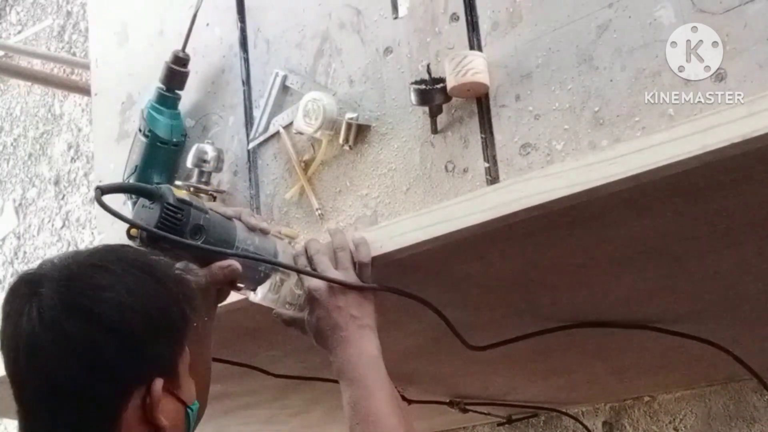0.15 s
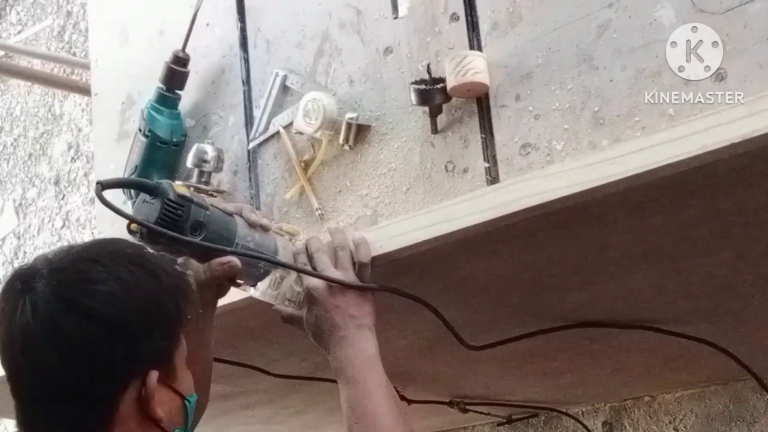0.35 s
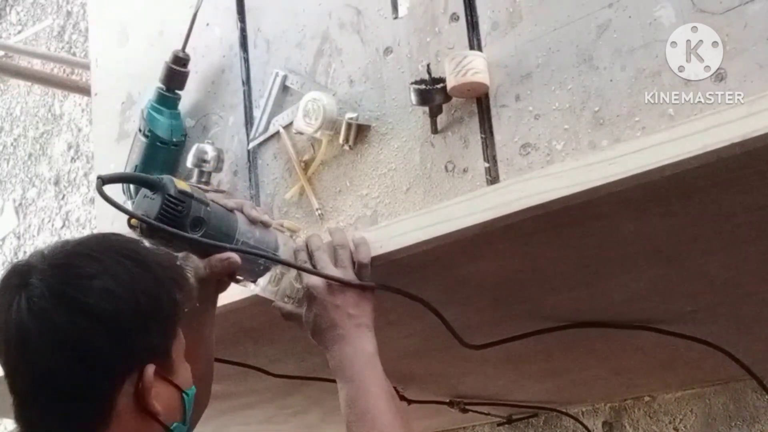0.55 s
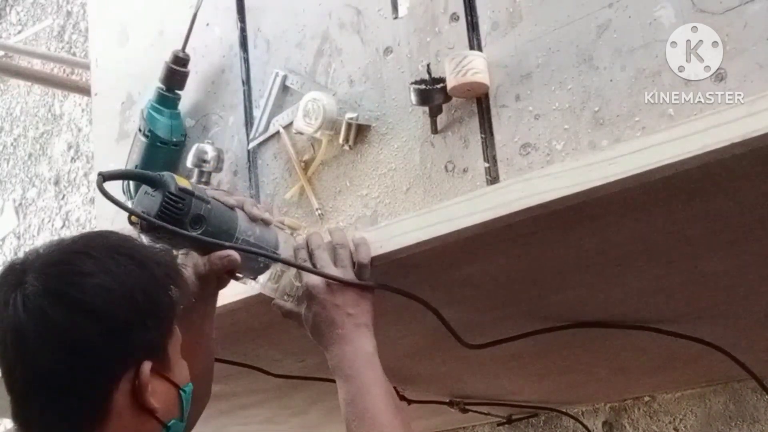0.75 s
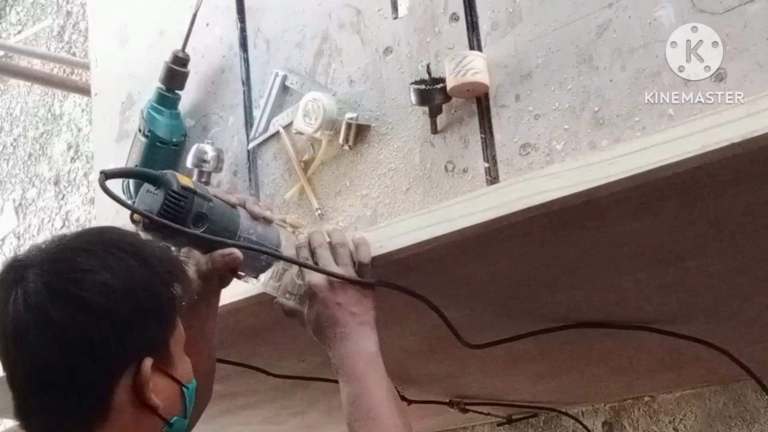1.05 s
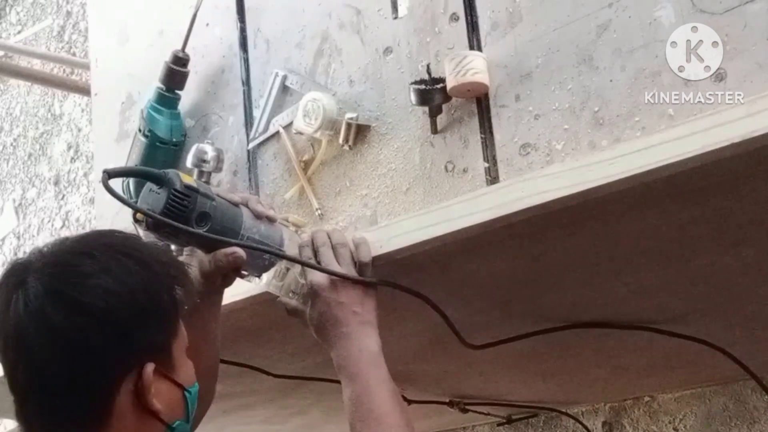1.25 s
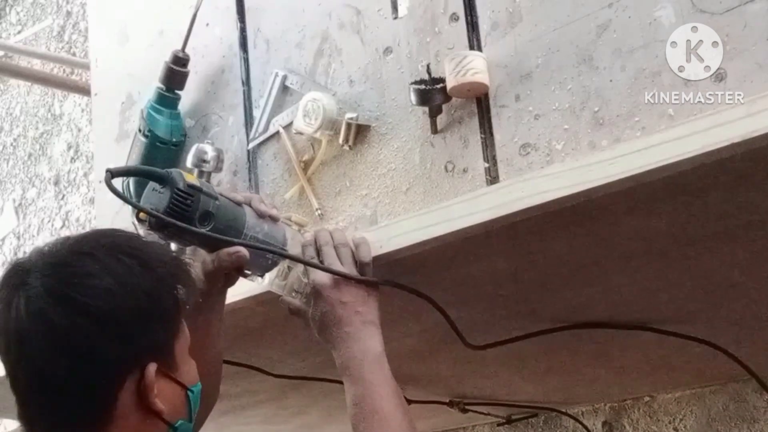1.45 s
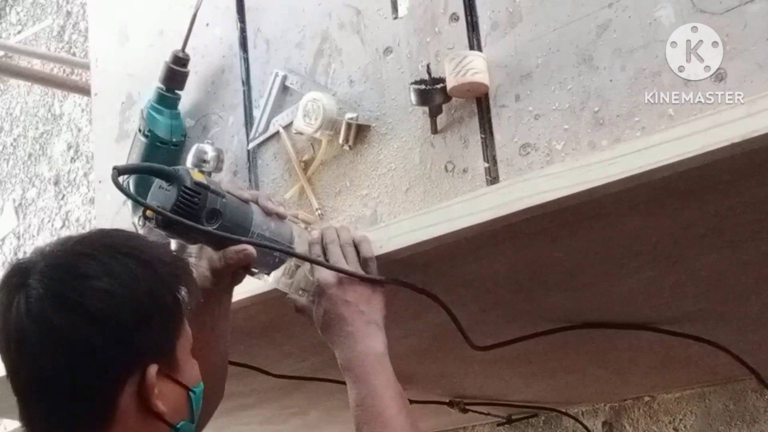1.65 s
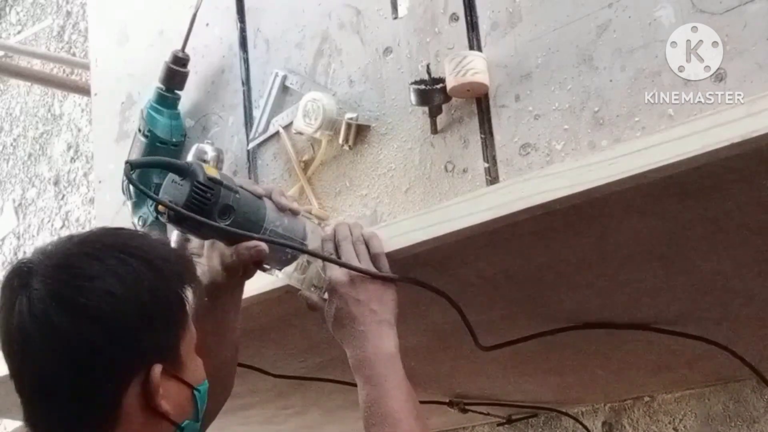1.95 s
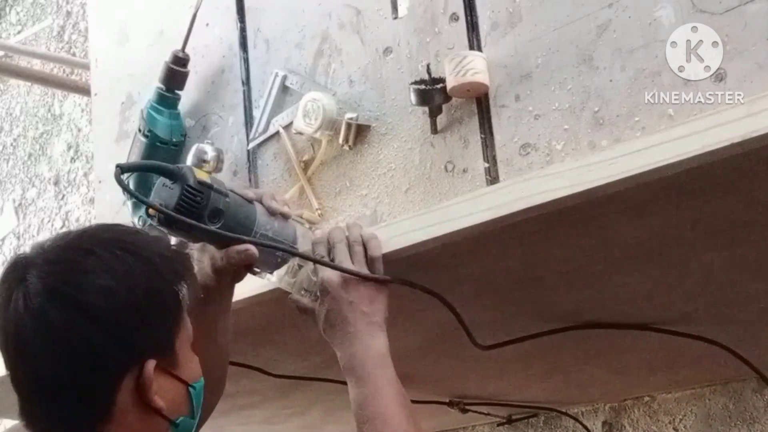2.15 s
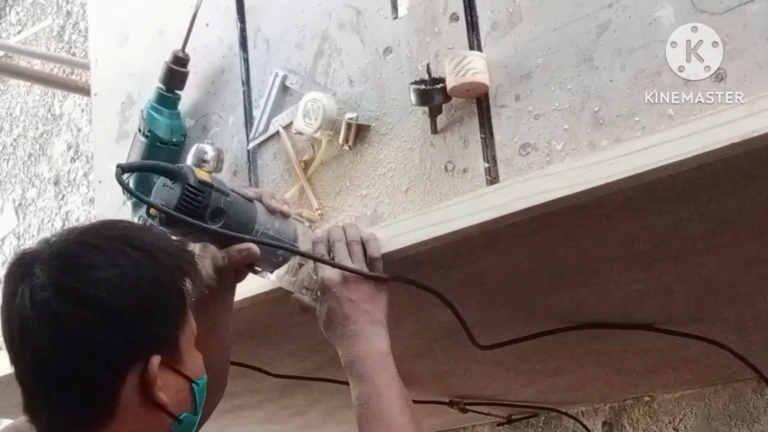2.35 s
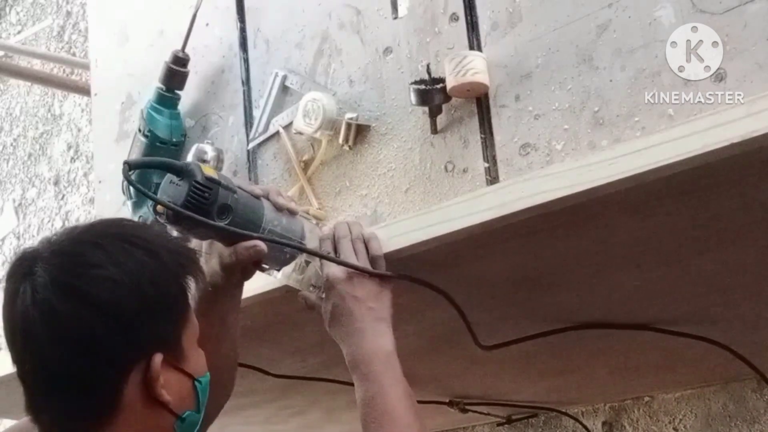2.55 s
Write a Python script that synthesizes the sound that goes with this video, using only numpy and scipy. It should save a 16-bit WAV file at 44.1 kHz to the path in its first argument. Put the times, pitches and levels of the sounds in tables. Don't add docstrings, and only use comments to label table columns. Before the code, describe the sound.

Handheld electric router running continuously, thin high whine and airy roar, cutting wood with faint knocks

```python
import sys
import numpy as np
from scipy import signal
from scipy.io import wavfile
from scipy.ndimage import uniform_filter1d

SR = 44100
rng = np.random.default_rng(int(sys.argv[2]) if len(sys.argv) > 2 else 0)


def amplitude_ratio(level_db):
    exponent = np.asarray(level_db, float) / 20
    return 10 ** exponent


def log_audio(samples):
    frames = np.atleast_2d(samples).T
    limited = np.clip(frames, -1, 1)
    pcm = np.round(limited * 32767).astype(np.int16)
    wavfile.write(sys.argv[1], SR, pcm)


N = 119070
TIME = np.arange(N) / SR

# (frequency [Hz], density [dB per Hz])
AIR_COLOUR = [(15, -53), (25, -42), (331, -20.5), (742, -20.5), (1240, -12.5), (1620, -13.5), (6560, -16),
              (8140, -11), (15500, -28.5)]
AIR_DB = -55
# (time [s], level [dB])
AIR_FLOW = [(0.0, -61), (0.12, -57), (0.35, -53.5), (0.55, -56), (0.66, -50.5), (0.8, -53), (0.93, -55),
            (1.0, -52.5), (1.2, -53.5), (1.27, -61), (1.42, -51), (1.55, -59), (1.72, -48.5), (1.97, -59.5),
            (2.15, -52), (2.36, -55), (2.45, -50.5), (2.62, -64), (2.7, -48.5)]
GUST_DB, WANDER = 1.0, 0.012
# (frequency [Hz], width [Hz], level [dB])
HOUSING_HOLLOWS = [(1254, 76, 1), (1207, 40, -9.5), (1336.3, 30, -5.5), (1151, 19, -10.5)]
# (frequency [Hz], width [Hz], level [dB])
STEADY_HOLLOWS = [(841.4, 78, -73), (336.6, 55, -74.5), (173.2, 28, -78), (252.6, 36, -82),
                  (461.6, 13, -83), (1444, 390, -62.5), (2067, 180, -68.5), (924.5, 27, -75),
                  (2203, 680, -65), (5315, 820, -61.5), (8230, 1040, -61), (4280, 400, -68),
                  (10730, 1900, -66.5), (110, 160, -81)]
# (time [s], peak level [dB], frequency [Hz], width [s])
AIR_SURGES = [(0.151, -43.5, 1239, 0.01), (0.18, -43.5, 1262, 0.015), (0.385, -44, 1268, 0.006),
              (0.469, -42, 1288, 0.0087), (0.495, -43, 1236, 0.018), (0.578, -44.5, 1277, 0.0069),
              (0.649, -41.5, 1247, 0.012), (0.698, -42.5, 1242, 0.0053), (0.705, -41, 1250, 0.006),
              (0.758, -42, 1262, 0.012), (0.777, -43, 1245, 0.0034), (0.791, -41.5, 1260, 0.0095),
              (0.854, -45.5, 1215, 0.0081), (0.89, -38.5, 1260, 0.0036), (1.01, -42.5, 1234, 0.029),
              (1.053, -42.5, 1240, 0.005), (1.174, -45.5, 1253, 0.028), (1.303, -39.5, 1247, 0.0073),
              (1.379, -44, 1280, 0.012), (1.447, -38.5, 1235, 0.016), (1.465, -37.5, 1268, 0.007),
              (1.476, -41.0, 1251, 0.007), (1.487, -44, 1275, 0.006), (1.585, -40.5, 1256, 0.018),
              (1.69, -37.5, 1261, 0.013), (1.706, -46, 1288, 0.0067), (1.738, -44, 1268, 0.0055),
              (1.765, -41.5, 1258, 0.014), (1.781, -39, 1236, 0.0086), (1.797, -42.0, 1268, 0.0067),
              (1.837, -38, 1238, 0.01), (1.849, -40, 1253, 0.0035), (1.875, -43.5, 1295, 0.0043),
              (1.887, -38.5, 1308, 0.005), (1.933, -40.5, 1254, 0.01), (1.944, -39.5, 1250, 0.013),
              (2.033, -42.5, 1291, 0.0057), (2.116, -44.5, 1272, 0.007), (2.165, -44.5, 1269, 0.0092),
              (2.223, -42, 1279, 0.007), (2.263, -38.5, 1226, 0.01), (2.294, -43.0, 1225, 0.007),
              (2.324, -45, 1253, 0.017), (2.423, -43, 1295, 0.012), (2.437, -42, 1320, 0.0068),
              (2.557, -45, 1244, 0.0064), (2.567, -41, 1255, 0.005), (2.687, -43.5, 1254, 0.015)]
SURGE_STRETCH, SURGE_DUCK = 0.61, 0.98

# (time [s], peak level [dB], pitch [Hz], length [s])
DOOR_BUMPS = [
    (0.761, -39, 110, 0.032),
    (0.788, -54, 117, 0.0263),
    (.65, -68, 100, 0.049),
    (1.805, -65, 118, .07),
    (2.526, -64, 98, 0.057),
    (2.58, -66, 149, .05),
]
# (time [s], length [s], level [dB])
HAND_SHUFFLES = [
    (.33, .09, -71),
    (.79, .09, -68),
    (.885, .14, -68),
    (.56, .04, -73),
    (2.42, .06, -73),
]
# (time [s], length [s], frequency [Hz], level [dB])
WOOD_RINGS = [(.57, .08, 2640, -59), (1.11, .05, 1550, -60), (1.3, .1, 8810, -57), (2.24, .07, 825, -60),
              (.53, .06, 830, -63), (1.33, .06, 825, -65), (1.52, .08, 3510, -63), (1.9, .07, 3590, -57),
              (1.61, .07, 835, -66), (.39, .05, 335, -65), (.78, .04, 325, -66), (1.73, .07, 325, -65),
              (1.54, .07, 325, -67), (2.26, .04, 330, -66)]

# (time [s], flute passes [Hz])
SPINDLE_SPEED = [(0.0, 897.7), (0.16, 899.2), (0.51, 894.2), (0.6, 886.8), (0.63, 881.2), (0.75, 878.9),
                 (0.95, 896.9), (1.07, 898.5), (1.22, 887.5), (1.46, 876.2), (1.54, 877.3), (1.76, 905.7),
                 (1.97, 894.3), (2.1, 905.1), (2.4, 906.4), (2.42, 905.8), (2.53, 897.0), (2.7, 897.0)]
WOBBLE = 0.0009
# (time [s], whine level [dB], overtone level [dB])
FAN_WHINE = [(0.0, -45, -78), (0.09, -52, -62), (0.24, -51, -65.0), (0.43, -45.5, -72),
             (0.73, -50.5, -71.0), (0.89, -44, -74), (0.96, -51.5, -88), (1.23, -45, -66.0),
             (1.24, -48, -72), (1.53, -49, -69), (1.59, -50, -72.0), (1.88, -49, -70.0), (1.94, -53, -76),
             (2.09, -43.5, -70), (2.36, -42, -76), (2.49, -50, -61), (2.63, -53.5, -96), (2.7, -48, -65.0)]
# (time [s], width [s], depth [dB])
WHINE_NULLS = [(.95, .012, -4), (1.37, .01, -5), (1.578, .009, -11), (1.68, .01, -16), (1.728, .008, -9),
               (1.77, .01, -5), (1.91, .01, -9), (1.962, .014, -18), (2.25, .015, -4), (2.31, .015, -4),
               (2.685, .012, -13)]
# (time [s], level [dB])
CUTTER_HUM = [(0, -58), (.26, -55), (.55, -56), (.62, -60), (.73, -57), (.78, -78), (.88, -72), (1.04, -61),
              (1.15, -56), (1.2, -72), (1.27, -60), (1.4, -65), (1.55, -60), (1.6, -78), (1.74, -74),
              (1.775, -54), (1.92, -45), (1.98, -55), (2.06, -68), (2.12, -78), (2.2, -65), (2.25, -74),
              (2.32, -63), (2.36, -78), (2.42, -60), (2.53, -47), (2.7, -53)]
# (time [s], flute tone [dB], 9th multiple [dB], collet ring [dB])
BASE_PLATE = [(0.0, -59, -59, -66), (0.17, -62.5, -53.5, -67), (0.49, -61.5, -66, -71),
              (0.53, -64.5, -57, -53), (0.59, -77, -70, -70), (0.82, -77, -65, -70), (0.88, -61, -59, -77),
              (1.04, -58, -60, -61), (1.4, -90, -62, -61), (1.55, -86, -69, -55), (1.63, -78, -58, -67),
              (1.73, -58.5, -60.5, -63), (1.92, -63, -51, -61.5), (2.0, -70, -72, -57),
              (2.07, -57, -58, -67), (2.21, -62, -60.0, -58), (2.28, -66, -59, -58.5),
              (2.34, -61, -66, -64), (2.43, -57.0, -54, -57.5), (2.63, -66, -62, -58), (2.7, -62, -61, -55)]
# (time [s], level [dB])
EDGE_CHATTER = [(0, -71), (.45, -69), (.6, -77), (.95, -77), (1.05, -68), (1.22, -65), (1.45, -72),
                (1.73, -72), (1.77, -60), (1.9, -56), (1.96, -60), (2.03, -68), (2.15, -71), (2.28, -63),
                (2.41, -70), (2.46, -57), (2.56, -54), (2.7, -61)]
# (multiple of the flute rate, level over the chatter [dB])
CHATTER_TONES = [(4, -15), (10, 0), (11, -9), (12, -5), (13, -13), (14, -15), (15, -19), (17, -18)]
SEVENTH_DB = -73
FADING, CHATTER_FADING, SKIRT = 0.13, 0.48, 0.1

# (time [s], length [s])
BIT_SQUEAL = (.553, .157)
SQUEAL_HZ, SQUEAL_DB, SQUEAL_WAVER_HZ = 7600, -48, 22
# (distance [flute rates], level [dB])
SQUEAL_SIDE_TONES = [(0, 4.5), (2, -3), (4, -27)]


def evened(x):
    return x / np.sqrt(np.mean(x ** 2) + 1e-20)


def curve(table, axis):
    rows = np.array(table)
    line = np.interp(TIME, rows[:, 0], rows[:, axis])
    return uniform_filter1d(line, size=800)


def drift(width):
    length = max(int(SR / 16 / width), 2)
    steps = N // 16 + 2
    slow = uniform_filter1d(rng.standard_normal(steps), length)
    slow = evened(uniform_filter1d(slow, length))
    return np.interp(np.arange(N) / 16, np.arange(steps), slow)


def resonate(x, hz, width):
    turn = np.exp(2j * np.pi * np.cumsum(hz * np.ones(N)) / SR)
    r = np.exp(-np.pi * width / SR)
    smooth = signal.lfilter([1], np.convolve([1, -r], [1, -r]), x / turn)
    return (turn * smooth).real


def ringing_noise(hz, width):
    return evened(resonate(rng.standard_normal(N), hz, width))


def add(mix, s, sound):
    part = mix[round(s * SR):][:len(sound)]
    part += sound[:len(part)]


def tone(phase, db, fading):
    slow = fading * (drift(37.5) + 1j * drift(53))
    fast = SKIRT * (drift(190) + 1j * drift(140))
    start = 2 * np.pi * rng.random()
    return (amplitude_ratio(db) * (1 + slow + fast) * np.exp(1j * (phase + start))).real


def air_noise():
    frames, hz = N // 256 + 5, np.fft.rfftfreq(1024, 1 / SR)
    real, imaginary, patches = rng.standard_normal((frames, 513, 3)).T
    patches = uniform_filter1d(patches, size=14, axis=0)
    patches = evened(uniform_filter1d(patches, size=12, axis=1))
    f, db = np.transpose(AIR_COLOUR)
    colour_db = np.interp(np.log(hz + 1), np.log(f), db)[:, None]
    spectrum = (real + 1j * imaginary) * amplitude_ratio(colour_db + 1.6 * patches)
    noise = signal.istft(spectrum, nperseg=1024, noverlap=768)[1][:N]
    return amplitude_ratio(AIR_DB) * evened(noise)


def surges():
    s, db, hz, width = np.transpose(AIR_SURGES)[:, :, None]
    swell = np.exp(-((TIME - s) / (SURGE_STRETCH * width)) ** 2)
    start = 2 * np.pi * rng.random((len(AIR_SURGES), 1))
    rings = (amplitude_ratio(db) * swell * np.sin(2 * np.pi * hz * TIME + start)).sum(0)
    return rings, 1 - SURGE_DUCK * swell.max(0)


def roar():
    rings, duck = surges()
    out = air_noise() + rings
    gust = duck * amplitude_ratio(curve(AIR_FLOW, axis=1) + GUST_DB * drift(27))
    wander = 1 + WANDER * drift(5.5)
    for hz, width, db in HOUSING_HOLLOWS:
        level = amplitude_ratio(db + 0.41 * drift(27))
        out += gust * level * ringing_noise(hz * wander, width)
    for hz, width, db in STEADY_HOLLOWS:
        level = amplitude_ratio(db + min(1.8, 900 / hz) * drift(11))
        out += level * ringing_noise(hz, width)
    return out


def knocks():
    out = np.zeros(N)
    for s, db, hz, length in DOOR_BUMPS:
        t = np.arange(0, length, 1 / SR)
        swell = np.sin(np.pi * (t / length) ** 0.64) ** 4.9
        add(out, s, -amplitude_ratio(db) * swell * np.cos(2 * np.pi * hz * (t - length / 2)))
    for s, length, db in HAND_SHUFFLES:
        rub = resonate(rng.standard_normal(N), 67, 81)[4000:]
        rub = evened(rub[:round(length * SR)])
        add(out, s, amplitude_ratio(db) * np.hanning(len(rub)) ** 0.5 * rub)
    for s, length, hz, db in WOOD_RINGS:
        t = np.arange(0, length, 1 / SR)
        add(out, s, amplitude_ratio(db) * np.sin(np.pi * t / length) * np.sin(2 * np.pi * hz * t))
    return out


def squeal(turns):
    start, length = BIT_SQUEAL
    u = np.clip((TIME - start) / length, 0, 1)
    hz = SQUEAL_HZ * (1 - 0.004 * (u - 0.5)) + SQUEAL_WAVER_HZ * drift(140)
    phase = 2 * np.pi * np.cumsum(hz) / SR
    cry = sum(tone(phase + round(k) * turns, SQUEAL_DB + db, FADING) for k, db in SQUEAL_SIDE_TONES)
    fades = np.clip(np.minimum(u / 0.06, (1 - u) / 0.1), 0, 1)
    return cry * fades * amplitude_ratio(-40 * (u - 0.62) ** 2)


def motor():
    flute_hz = curve(SPINDLE_SPEED, axis=1) * (1 + WOBBLE * drift(41))
    turns = 2 * np.pi * np.cumsum(flute_hz) / SR
    null_db = sum(db * np.exp(-((TIME - s) / width) ** 2) for s, width, db in WHINE_NULLS)
    out = tone(turns, curve(BASE_PLATE, axis=1), FADING)
    out += tone(2 * turns, curve(CUTTER_HUM, axis=1), FADING)
    out += tone(8 * turns, curve(FAN_WHINE, axis=1) + null_db, FADING)
    out += tone(9 * turns, curve(BASE_PLATE, axis=2), FADING)
    out += tone(6 * turns, curve(BASE_PLATE, axis=3), FADING)
    out += tone(7 * turns, SEVENTH_DB, CHATTER_FADING)
    out += tone(16 * turns, curve(FAN_WHINE, axis=2), CHATTER_FADING)
    chatter_db = curve(EDGE_CHATTER, axis=1)
    for k, db in CHATTER_TONES:
        out += tone(round(k) * turns, db + chatter_db, CHATTER_FADING)
    return np.sqrt(2) * (out + squeal(turns))


def scene():
    return np.tile(roar() + knocks() + motor(), (2, 1))


def band_limit(x):
    return signal.sosfilt(signal.butter(12, 15680, fs=SR, output="sos"), x)


def record(dry):
    low_pass = signal.firwin(1201, 15480, window=("kaiser", 8), fs=SR)
    mix = signal.oaconvolve(dry, low_pass[None], "same")
    return band_limit(mix)


dry = scene()
out = record(dry)
log_audio(out)
```